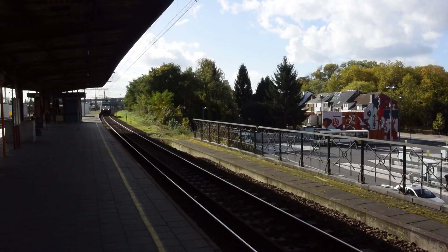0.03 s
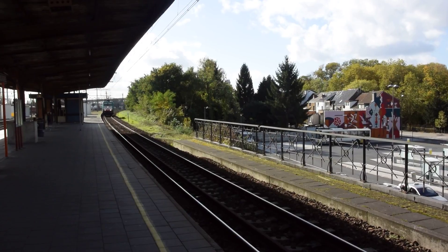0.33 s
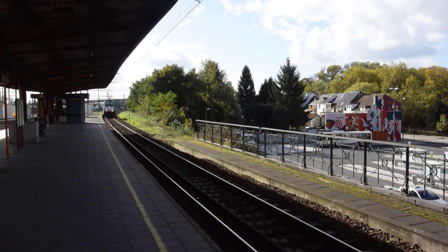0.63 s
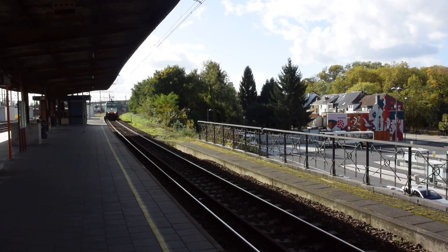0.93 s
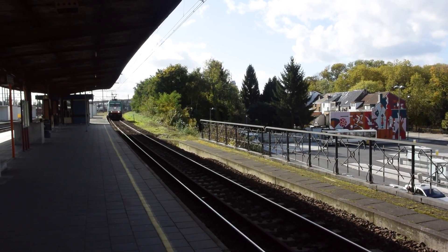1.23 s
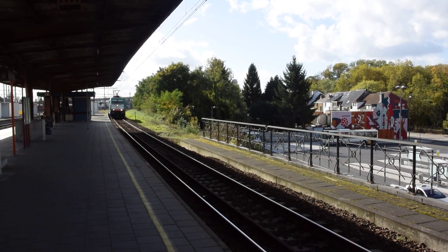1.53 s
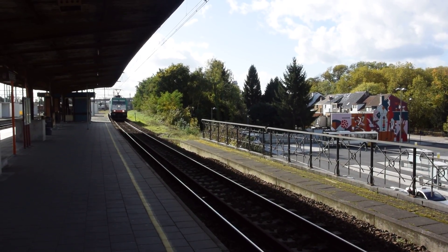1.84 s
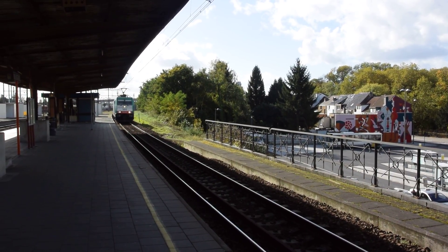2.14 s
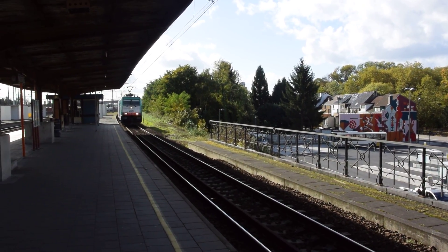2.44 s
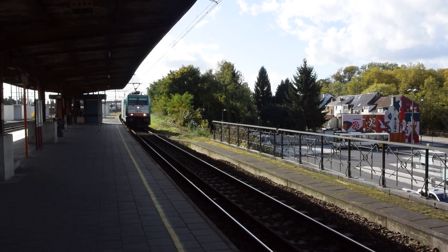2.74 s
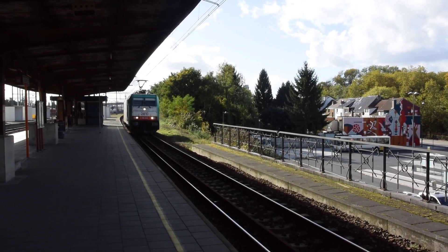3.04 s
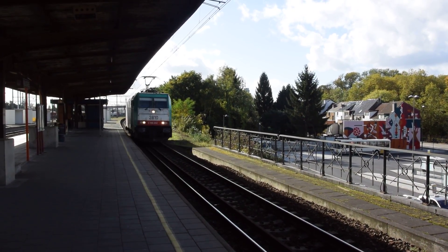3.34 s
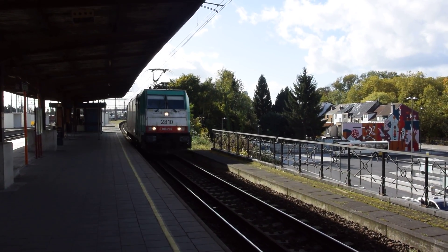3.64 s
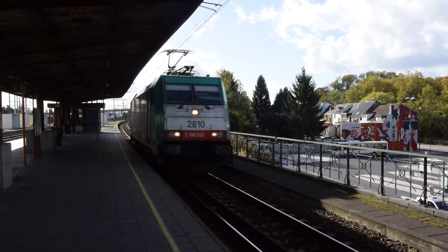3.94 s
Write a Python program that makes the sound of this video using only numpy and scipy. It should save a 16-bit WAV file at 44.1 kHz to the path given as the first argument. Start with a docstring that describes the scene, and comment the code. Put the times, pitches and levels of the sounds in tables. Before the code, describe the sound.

A train rushes closer at a covered station platform, at first faint behind rough wind gusts on the microphone. Its wheel roar and high rail hiss build steadily, dipping under each gust and swelling back in the lulls.

```python
"""A covered platform: an electric locomotive rushes closer, its wheels roaring, the rails hissing
and singing ever louder. Gusts buffet the two microphone ports, mostly the right one; small
vortices chirp in them and a few hard slaps of air overload them. The recorder's gain control
ducks the train under the gusts and lets it swell back in the lulls."""
import sys
import numpy as np
from scipy import signal
from scipy.io import wavfile
from scipy.ndimage import uniform_filter1d

SR = 44100
rng = np.random.default_rng(int(sys.argv[2]) if len(sys.argv) > 2 else 0)


def digitize_waveform(pressure):
    """Quantize a signal to 16-bit integers and store it at the path in sys.argv[1].

    Rows of a 2-D input are taken as channels; values are limited to [-1, 1].
    """
    field = np.atleast_2d(pressure).T
    bounded = np.clip(field, -1, 1)
    quanta = np.round(bounded * 32767).astype(np.int16)
    wavfile.write(sys.argv[1], SR, quanta)


N = 176400
TIME = np.arange(N) / SR


def from_db(db):
    """Decibels to gain."""
    return 10 ** (np.asarray(db) / 20)


def to_db(x):
    """Gain to decibels."""
    return 20 * np.log10(np.abs(x) + 1e-9)


def unit_rms(x):
    """Scale to an rms of 1."""
    return x / np.sqrt(np.mean(x ** 2) + 1e-20)


def at_hz(curve, hz):
    """Read a curve on a log-frequency axis."""
    freqs, values = np.transpose(curve)
    return np.interp(np.log(hz), np.log(freqs), values)


def drift(rate_hz):
    """Smooth random modulation with an rms of 1."""
    r = np.exp(-2 * np.pi * rate_hz / SR)
    return unit_rms(signal.lfilter([1], [1, -2 * r, r * r], rng.standard_normal(N + SR))[SR:])


def noise_bands(spectrum, channels):
    """Third-octave bands (centre_hz, noise) shaped to a spectrum; together they have an rms of 1."""
    edges_hz = 25 * 2 ** (np.arange(29) / 3)
    white = rng.standard_normal((2, channels, N))
    bands = []
    for k, (low, high) in enumerate(zip(edges_hz, edges_hz[1:])):
        if high > spectrum[0][0] and low < spectrum[-1][0]:
            hz = np.sqrt(low * high)
            bandpass = signal.butter(2, [low, high], "band", fs=SR, output="sos")
            bands.append((hz, from_db(at_hz(spectrum, hz)) * signal.sosfilt(bandpass, white[k % 2])))
    total = np.sqrt(sum(np.mean(noise ** 2) for _, noise in bands))
    return [(hz, noise / total) for hz, noise in bands]


def widen(pair, hz):
    """Two unrelated noises become mid and side: centred in the bass, diffuse in the treble."""
    # likeness of the train in left and right: freq_hz, correlation
    likeness = [(100, 0.94), (900, 0.49), (2000, 0.89), (4000, 0.28), (7500, 0.033)]
    alike = np.clip(at_hz(likeness, hz), -1, 1)
    mid, side = np.sqrt(1 + alike) * pair[0], np.sqrt(1 - alike) * pair[1]
    return np.array([mid + side, mid - side]) / np.sqrt(2)


def rushing(spectrum):
    """Stereo noise of wheels on rails, each band flickering by about 1 dB."""
    return sum(widen(noise, hz) * from_db(drift(rate_hz=17))
               for hz, noise in noise_bands(spectrum, channels=2))


def wheel_roar(nearness):
    """Rolling wheels roar in the low mids, growing a little slower than the inverse distance law."""
    # tone of the roar: freq_hz, relative_db (per Hz)
    spectrum = [(60, 11.5), (160, 23.5), (300, 20.5), (530, 31), (680, 13), (840, 30.5), (1100, 1),
                (1600, -17), (3000, -63.5)]
    return from_db(-33.5) * nearness ** 0.84 * rushing(spectrum)


def rail_hiss(nearness):
    """The rails hiss ahead of the train, swelling and sinking as it nears."""
    # tone of the hiss: freq_hz, relative_db (per Hz)
    spectrum = [(700, 19), (1300, 8), (2200, 9), (3000, 6.5), (4400, 5), (6000, -2.5), (7500, -3),
                (8700, -21), (10000, -32), (12000, -20.5)]
    # level ride on the hiss: time_s, gain_db
    swell = [(.9, 0.5), (1.7, -1.5), (2.1, 3), (2.3, -3), (2.44, 3.5), (2.6, 3), (3.2, -.5), (3.85, 0)]
    level_db = -33 + np.interp(TIME, *np.transpose(swell))
    return from_db(level_db) * nearness ** 0.7 * rushing(spectrum)


def rail_singing(nearness):
    """The wheels keep narrow resonances of the rails ringing."""
    # rail resonances: pitch_hz, width_hz, level_db (at nearness 1)
    modes = [(4300, 18, -64), (4360, 22, -62.5), (5480, 33, -64.5), (6620, 44, -62), (6360, 130, -64),
             (6720, 130, -51.5), (7230, 52, -59.5), (7270, 56, -59.5)]
    singing = 0
    for hz, width_hz, db in modes:
        r = np.exp(-np.pi * width_hz / SR)
        poles = [1, -2 * r * np.cos(2 * np.pi * hz / SR), r * r]
        ring = signal.lfilter([1, 0, -1], poles, rng.standard_normal((2, N)))
        singing += from_db(db) * widen(unit_rms(ring), hz)
    return nearness ** 0.27 * singing


def locomotive():
    """Roar, hiss and singing grow as the distance shrinks; the platform roof adds one echo."""
    arrival_s = 4.43   # when it would reach the microphone
    echo_s, echo_db, pan_db = 0.015, -12, 0.5
    nearness = 1 / np.maximum(arrival_s - TIME, .1)
    train = wheel_roar(nearness) + rail_hiss(nearness) + rail_singing(nearness)
    train = signal.sosfilt(signal.butter(5, 9900, "low", fs=SR, output="sos"), train)
    echo = np.array([np.interp(TIME - echo_s, TIME, side) for side in train])
    return (train + from_db(echo_db) * echo) * from_db([[-pan_db], [pan_db]])


def buffeting(gusts, breeze_db):
    """Turbulence on one port: bell-shaped gusts over a dull breeze, all full of eddies."""
    # tone of a typical gust: freq_hz, relative_db (per Hz)
    spectrum = [(40, -33), (65, -19.5), (110, -5), (190, 4), (330, 6.5), (550, 5.5), (900, -1.5),
                (1400, -14), (2200, -36.5), (3500, -48)]
    # passband of the buffeting: low_hz, high_hz
    passband = [68.6, 3030]
    breeze_tilt, pivot_hz = -7, 430   # tilts are in dB per octave about the pivot
    eddy_db, flutter_db, trim_db = 2.5, 5.5, -1
    power = from_db(breeze_db) ** 2
    weighted_tilt = power * breeze_tilt
    for centre_s, length_s, db, gust_tilt in gusts:
        gust_power = (from_db(db) * np.exp(-(2 * (TIME - centre_s) / length_s) ** 2)) ** 2
        power += gust_power
        weighted_tilt += gust_power * gust_tilt
    lumps_db = eddy_db * np.minimum(drift(rate_hz=67), 1.5) + flutter_db * drift(rate_hz=160)
    tilt = np.clip(weighted_tilt / power + 0.2 * lumps_db, -6, 7)   # stronger eddies are brighter
    air = sum(noise[0] * from_db(tilt * np.log2(max(hz / pivot_hz, .5)))
              for hz, noise in noise_bands(spectrum, channels=1))
    air *= from_db(lumps_db)
    envelope = uniform_filter1d(np.abs(signal.hilbert(air)), size=90)
    air /= np.sqrt(1 + (envelope / 2.73) ** 2)   # the strongest turbulence levels off
    air *= from_db(trim_db) * np.sqrt(power)
    return signal.sosfilt(signal.butter(3, passband, "band", fs=SR, output="sos"), air)


def wind():
    """Each port catches its own gusts; the right one takes most of them."""
    # gusts on each port: centre_s, length_s, level_db, tilt_db_per_octave
    left_gusts = [(.423, 0.39, -14.5, -8), (.535, .07, -6.5, -7), (.691, 0.026, -3.5, -5),
                  (.757, 0.029, -10, -9.5), (.804, .035, -5.5, -6.5), (1.039, 0.02, -7, 1),
                  (1.068, 0.013, -6, 2), (1.113, 0.076, -10, -3), (1.18, 0.013, -2, 1),
                  (1.21, 0.018, -6.5, -1), (1.3, 0.051, -9.5, -2), (1.752, 0.19, -20, -5.5),
                  (2.1, 0.022, -21, -15.5), (2.596, 0.034, -11, 0), (2.72, 0.0033, -8, -2),
                  (3.13, 0.16, -21.5, -2), (3.281, 0.0088, -2.5, 8.5), (3.539, 0.0045, -1.5, 7.5),
                  (3.631, .009, -8.5, 3), (3.93, .13, -15.5, -2)]
    right_gusts = [(.392, 0.014, 2.5, -12), (.416, .035, -1, -3), (.442, 0.016, 3, 4), (.499, 0.077, 3, 2),
                   (.584, 0.0072, 6, 1.5), (.615, 0.057, 3, -2), (.69, 0.0074, -5, -0.5),
                   (.712, 0.035, -13, -2.5), (.74, 0.0031, -4.5, 2), (.767, 0.0071, -3.5, -2),
                   (.797, 0.0039, -5, 1), (.832, 0.048, -4.5, 3), (.897, .041, -13, -4.5),
                   (.96, 0.032, -7.5, -1.5), (.998, 0.031, -14, 0.5), (1.029, 0.006, -7.5, -3),
                   (1.157, .065, -4, 5), (1.239, 0.037, -8.5, -4.5), (1.298, 0.035, -11, -6),
                   (1.347, 0.014, 0.5, -1.5), (1.388, 0.11, -5.5, 0.5), (1.463, 0.074, -11, -2),
                   (1.51, 0.056, -8.5, -2.5), (1.645, 0.077, -9.5, 0), (1.71, 0.072, -2.5, 2.5),
                   (1.808, 0.082, -5, 3.5), (1.86, 0.026, 0.5, 2.5), (1.903, 0.032, -5, -6.5),
                   (1.975, 0.031, -6, 5), (2.104, 0.016, -2.5, -7), (2.126, 0.029, -5.5, 4),
                   (2.198, 0.016, -8, 4.5), (2.237, 0.0056, -1, 3.5), (2.27, 0.069, -11, 2.5),
                   (2.325, .035, -14.5, 0), (2.465, 0.013, -9.5, -1.5), (2.546, 0.032, -8, 0.5),
                   (2.585, 0.044, -8, 1), (2.639, 0.017, -3.5, -3.5), (2.666, 0.067, -10, 7.5),
                   (2.722, 0.017, -6.5, 0.5), (2.758, 0.087, -8.5, 3), (2.834, 0.083, -17.5, 3),
                   (2.877, 0.004, -10, 8.5), (2.93, 0.041, -8, 2), (3.023, 0.014, -6.5, 5.5),
                   (3.06, 0.058, -9.5, 5.5), (3.208, 0.14, -15.5, 5), (3.262, 0.03, -4.5, 0.5),
                   (3.336, 0.076, -2, 6.5), (3.392, 0.013, -9, -5.5), (3.427, 0.0079, -9, -2),
                   (3.594, 0.014, -5, 3.5), (3.628, .06, -6.5, 1.8), (3.772, .02, -11.5, -2),
                   (3.847, 0.0068, -8, 8), (3.864, 0.057, -8, 5), (3.912, 0.06, -5.5, 4),
                   (3.94, 0.018, -5, 8), (3.975, 0.047, -4, 3)]
    return np.array([buffeting(left_gusts, breeze_db=-28), buffeting(right_gusts, breeze_db=-18.5)])


def vortex_chirps():
    """Small vortices whistle across the right port for a few cycles."""
    # bright chirps inside the gusts: centre_s, length_s, pitch_hz, peak_db
    chirps = [(0.585, 0.0034, 1680, -2), (.833, 0.0012, 1570, -3), (0.968, 0.0016, 2030, -6),
              (1.164, 0.0026, 1510, -6), (1.813, 0.0007, 1570, -1), (1.975, 0.0016, 1660, -9.5),
              (2.94, .002, 1710, -12), (3.039, 0.0021, 1630, -11), (3.266, 0.0015, 2030, -8),
              (3.353, 0.00068, 1890, 6), (3.394, 0.00052, 1900, -2.5), (3.863, 0.00085, 1600, 4),
              (3.907, 0.0006, 1790, -0.5), (3.923, 0.0033, 1410, 2), (3.966, 0.00093, 2470, 1),
              (3.993, 0.0013, 1290, -8)]
    ports = np.zeros((2, N))
    for centre_s, length_s, hz, db in chirps:
        t = TIME - centre_s
        envelope = from_db(db) * np.exp(-(2 * t / length_s) ** 2)
        ports[1] += envelope * np.sin(2 * np.pi * (hz * t + rng.random()))
    return ports


def air_slaps():
    """Single eddies hit a port: a pressure spike, pointed or blunt, between two shallow dips."""
    # slaps of air: centre_s, decay_s, peak_db, bluntness, port (0 left, 1 right)
    slaps = [(.527, .0001, 8, 2, 0), (.626, .00009, 12, 2, 1), (1.727, .0001, 6, 2, 1),
             (1.864, .0001, 7, 2, 1), (2.1153, .00016, 20, 0, 1), (3.2686, .00014, 21, 0, 1),
             (3.537, .00014, 10, .1, 0), (3.965, .00007, 6, 2, 1)]
    ports = np.zeros((2, N))
    for centre_s, decay_s, db, blunt, port in slaps:
        from_tip = np.minimum(np.hypot((TIME - centre_s) / decay_s, blunt) - blunt, 50)
        ports[port] += from_db(db) * (1 - from_tip) * np.exp(-from_tip)
    return ports


def scene():
    """Wind on both ports, with the train behind it."""
    return wind() + locomotive() + air_slaps() + vortex_chirps()


def reduction_db(over_db, release_db_per_s):
    """Gain reduction with an instant attack and a steady release."""
    ramp_db = release_db_per_s * TIME
    return np.maximum.accumulate(np.maximum(over_db, 0) + ramp_db) - ramp_db


def gain_control(x):
    """The louder port ducks both channels a moment later; the gain then climbs back."""
    threshold_db, sensor_ceiling_db = -14.5, 7
    smoothing_s, lag_s = 0.0029, 0.0012
    r = np.exp(-1 / (smoothing_s * SR))
    rectified = np.minimum(np.abs(x), from_db(sensor_ceiling_db))
    sensed = signal.lfilter([1 - r], [1, -r], rectified).max(axis=0)
    duck_db = reduction_db(to_db(sensed) - threshold_db, release_db_per_s=92)
    return x * from_db(-np.interp(TIME - lag_s, TIME, duck_db))


def limiter(x):
    """An instant limiter of limited depth flattens the peaks that get through, with a small crackle."""
    threshold_db, depth_db = -6, 8
    over_db = np.minimum(to_db(np.abs(x).max(axis=0)) - threshold_db, depth_db)
    return x * from_db(-reduction_db(over_db, release_db_per_s=2500))


def record(dry):
    """The recorder ducks, limits and clips; it fades in as it is switched on and cuts the top."""
    switch_on_s, fade_s, stopband_hz = 0.332, 0.061, 17200
    clipped = np.clip(limiter(gain_control(dry)), -1, 1)
    fade_in = np.clip((TIME - switch_on_s) / fade_s, 0, 1)
    return signal.sosfilt(signal.cheby2(12, 60, stopband_hz, fs=SR, output="sos"), clipped * fade_in)


dry = scene()
out = record(dry)
digitize_waveform(out)
```